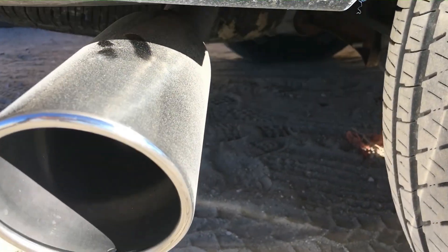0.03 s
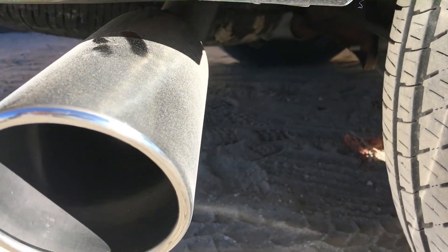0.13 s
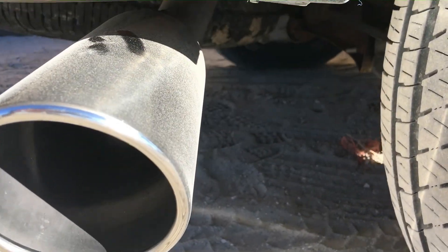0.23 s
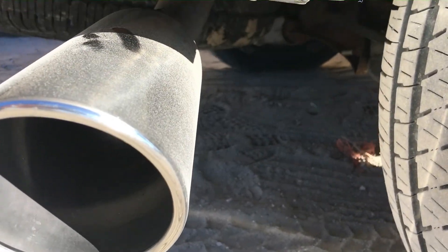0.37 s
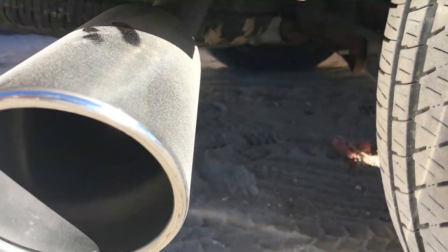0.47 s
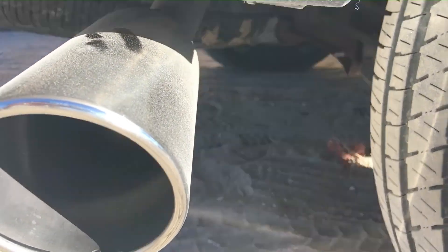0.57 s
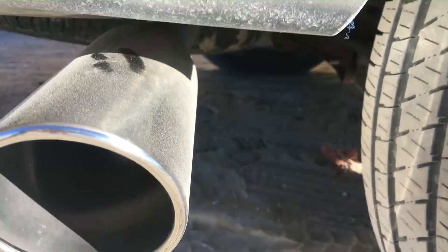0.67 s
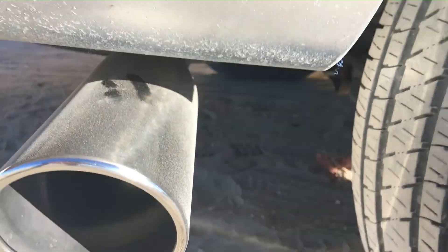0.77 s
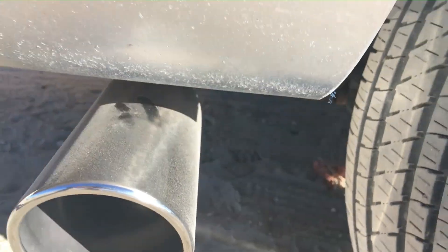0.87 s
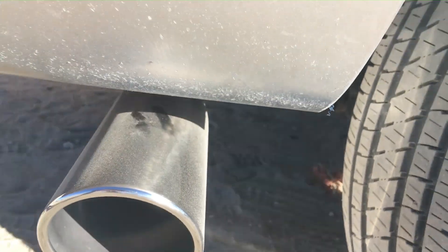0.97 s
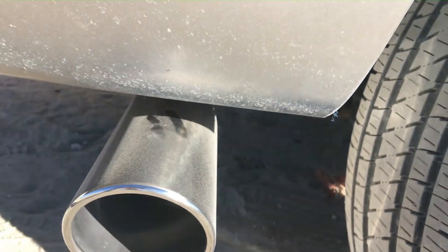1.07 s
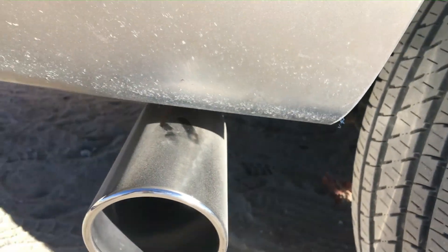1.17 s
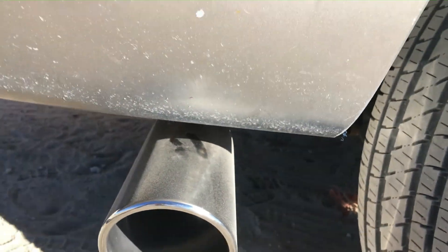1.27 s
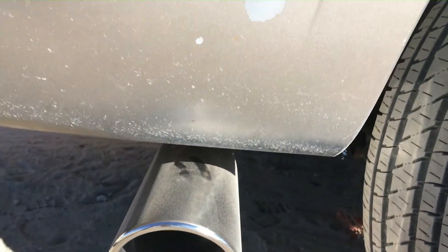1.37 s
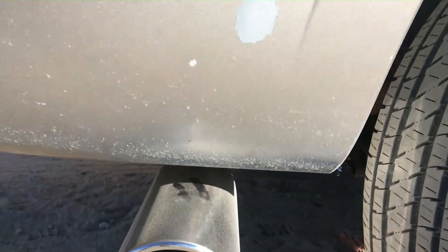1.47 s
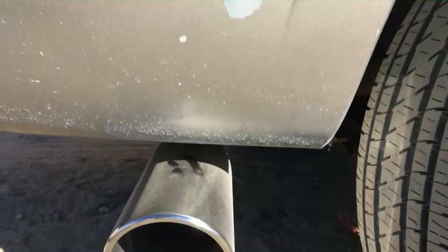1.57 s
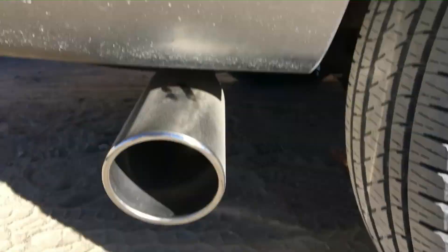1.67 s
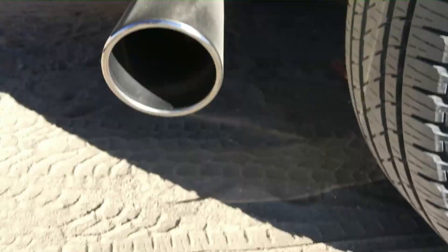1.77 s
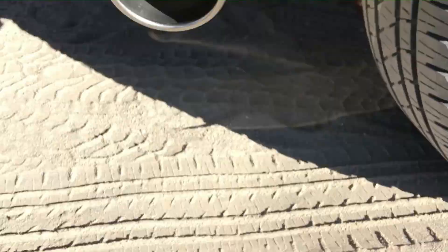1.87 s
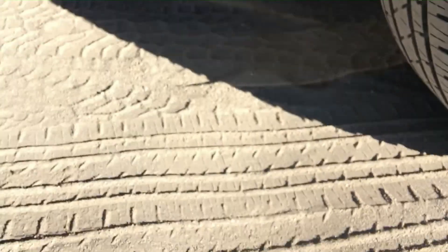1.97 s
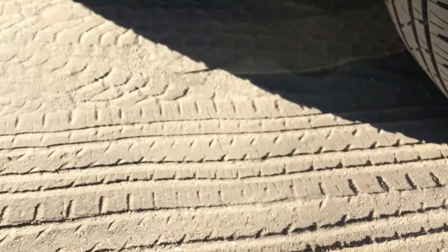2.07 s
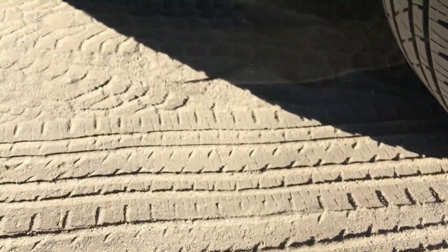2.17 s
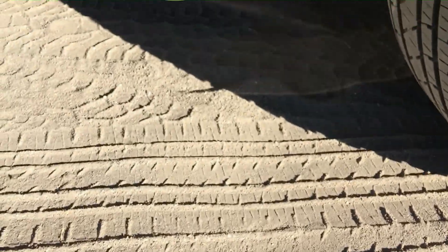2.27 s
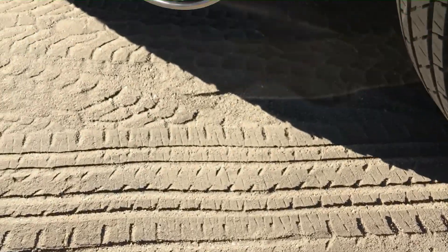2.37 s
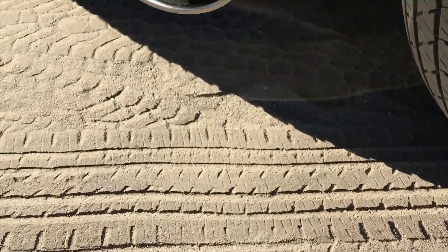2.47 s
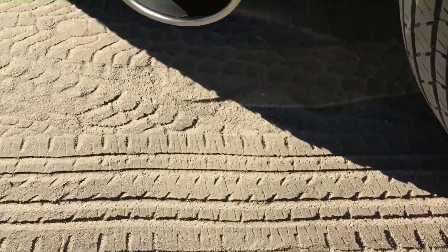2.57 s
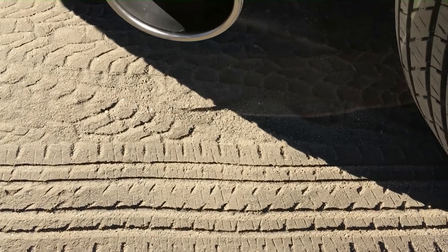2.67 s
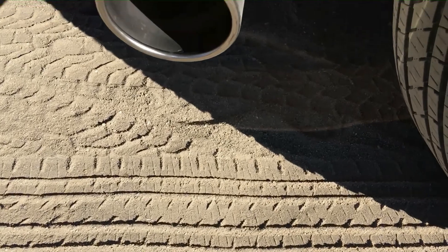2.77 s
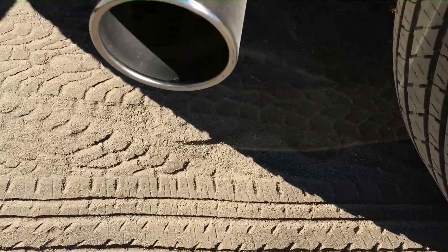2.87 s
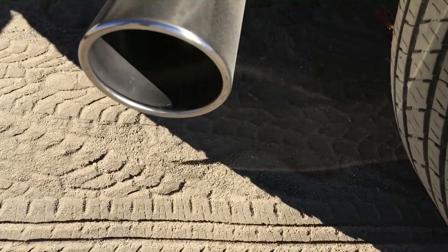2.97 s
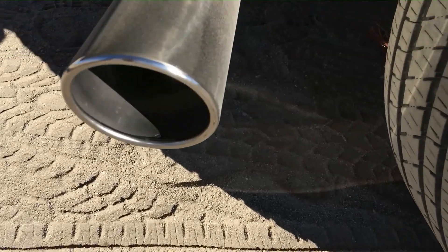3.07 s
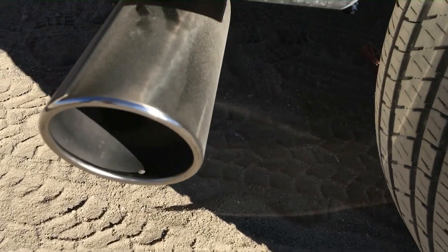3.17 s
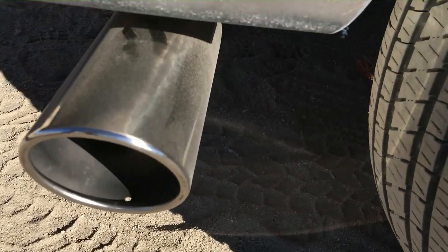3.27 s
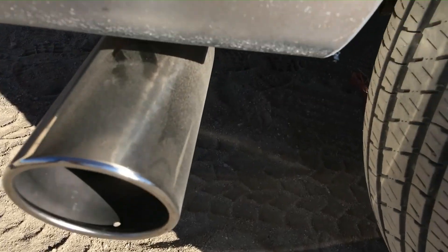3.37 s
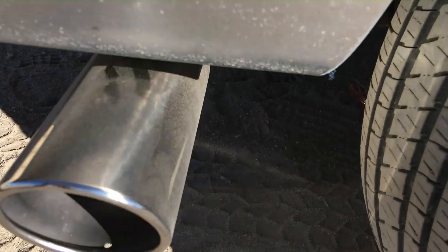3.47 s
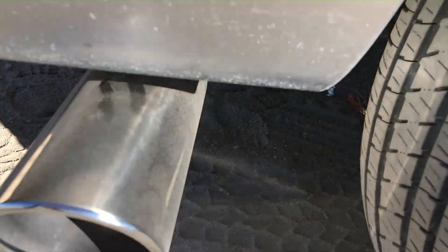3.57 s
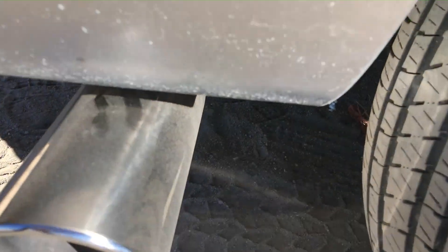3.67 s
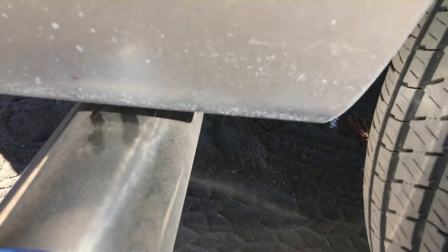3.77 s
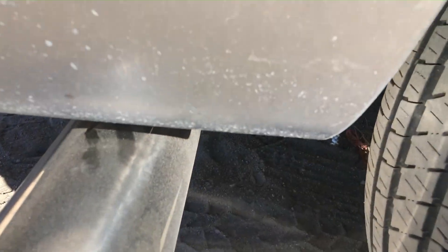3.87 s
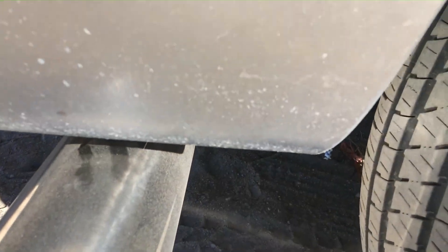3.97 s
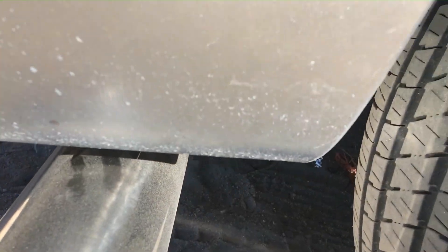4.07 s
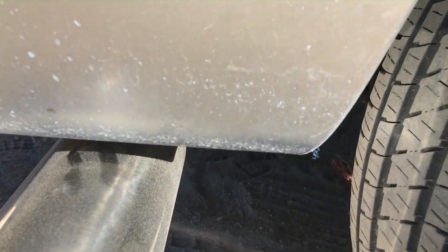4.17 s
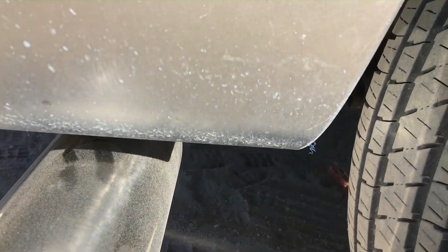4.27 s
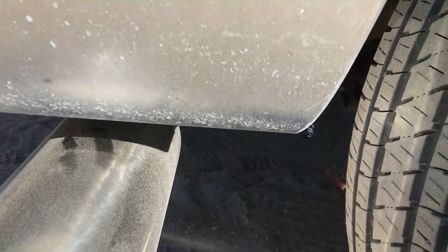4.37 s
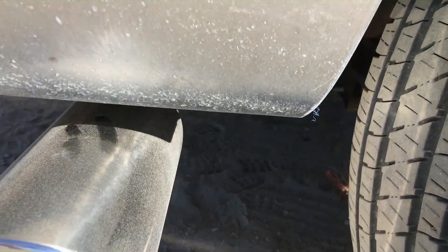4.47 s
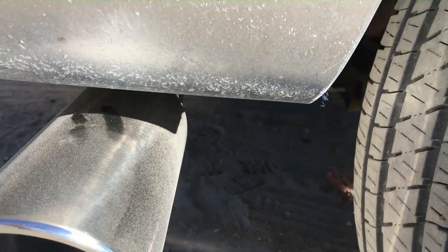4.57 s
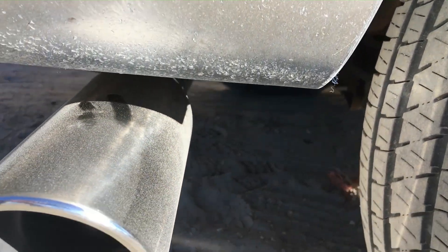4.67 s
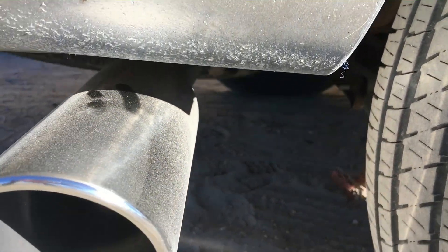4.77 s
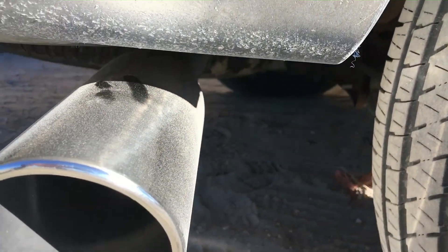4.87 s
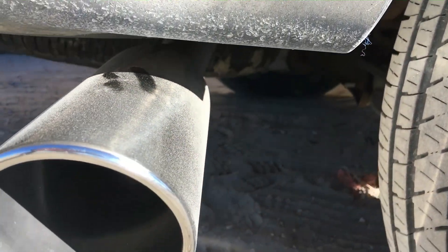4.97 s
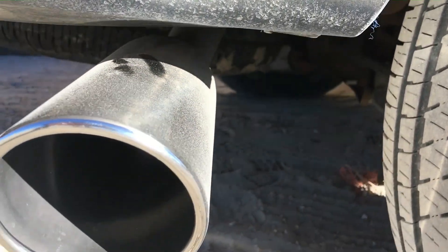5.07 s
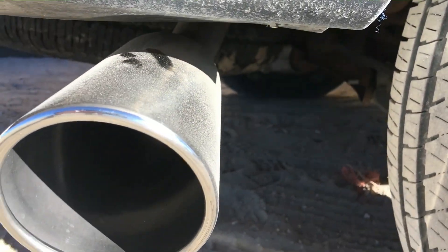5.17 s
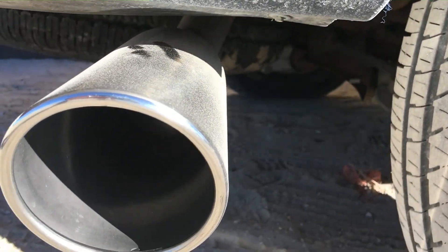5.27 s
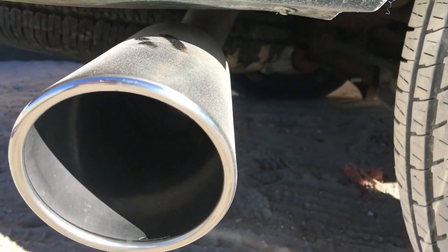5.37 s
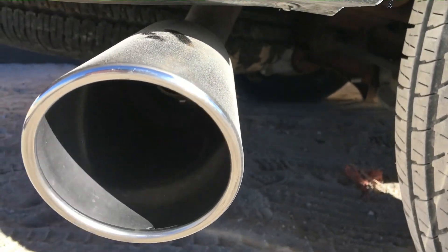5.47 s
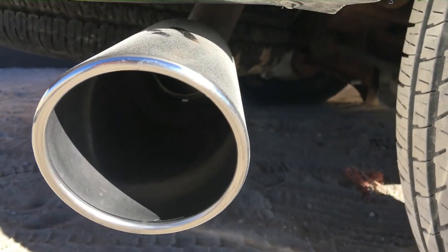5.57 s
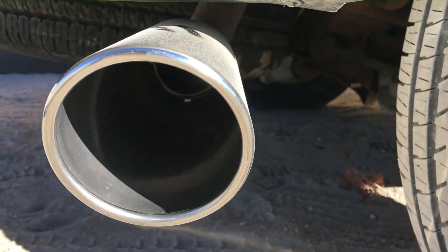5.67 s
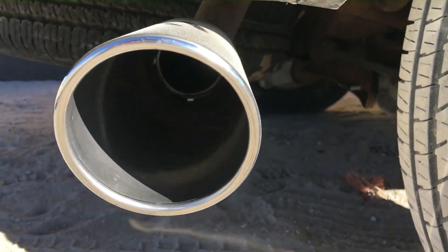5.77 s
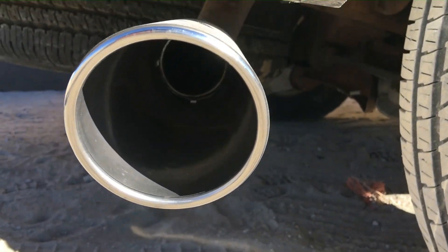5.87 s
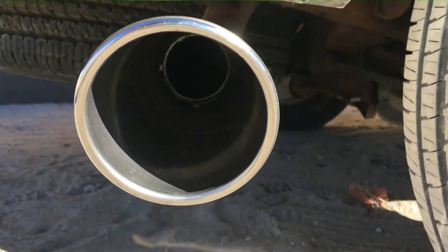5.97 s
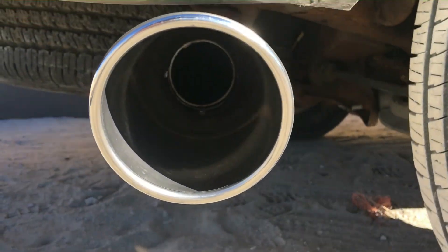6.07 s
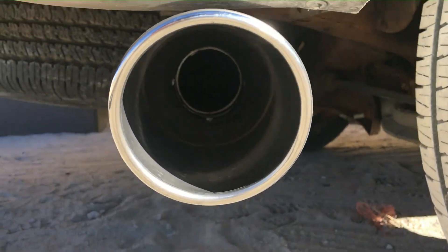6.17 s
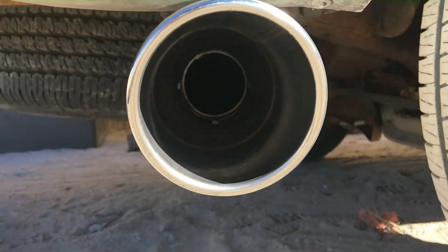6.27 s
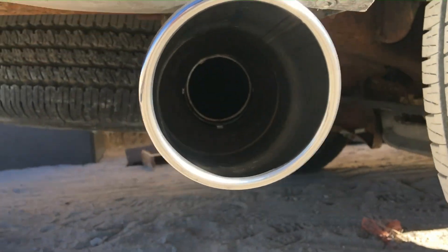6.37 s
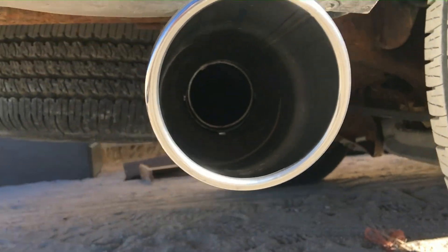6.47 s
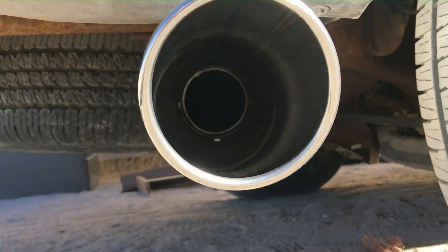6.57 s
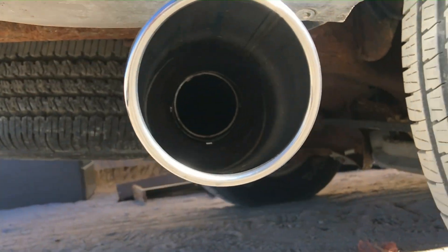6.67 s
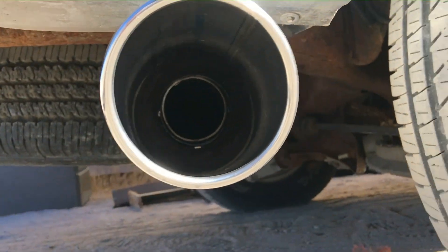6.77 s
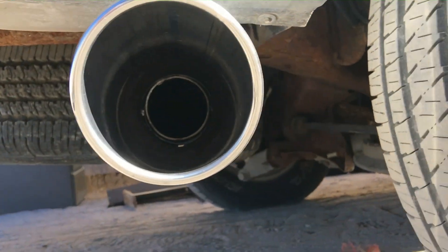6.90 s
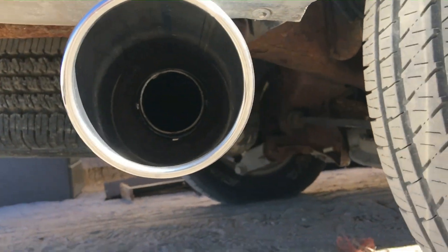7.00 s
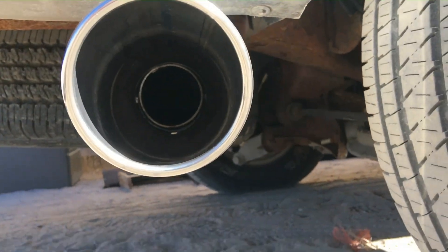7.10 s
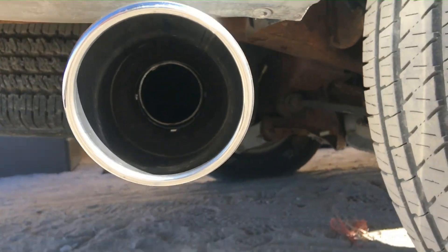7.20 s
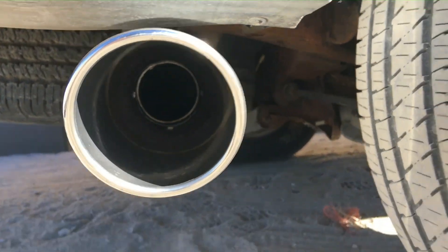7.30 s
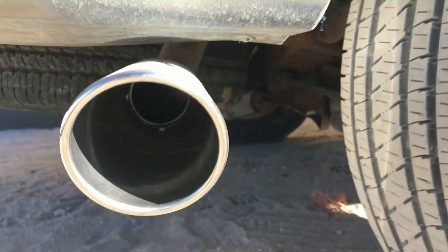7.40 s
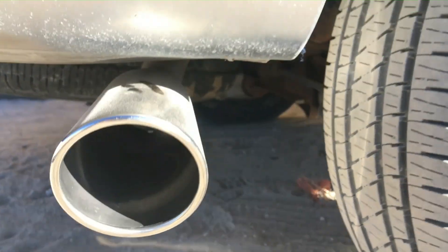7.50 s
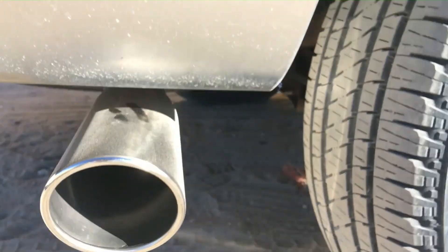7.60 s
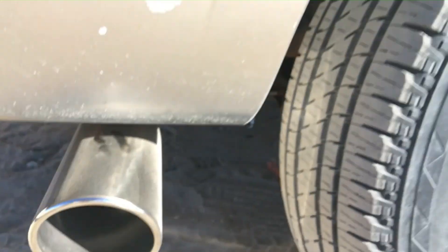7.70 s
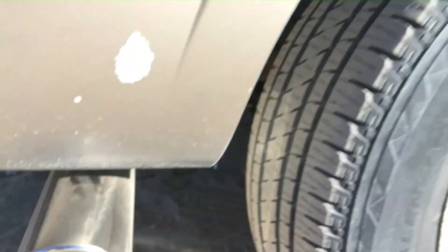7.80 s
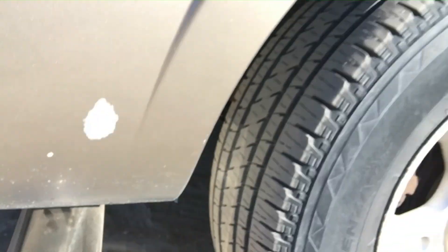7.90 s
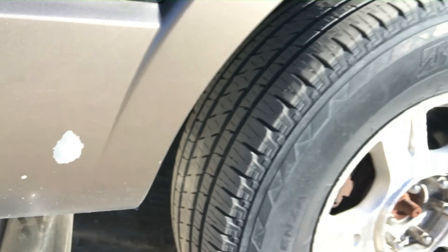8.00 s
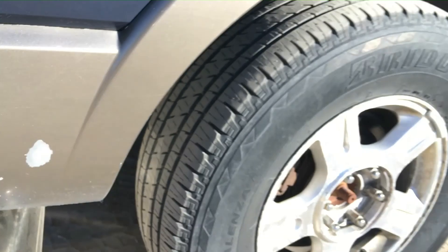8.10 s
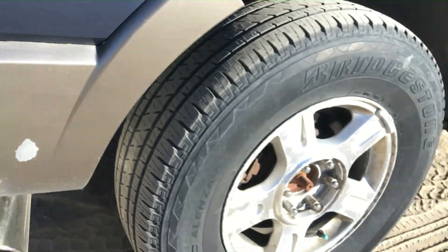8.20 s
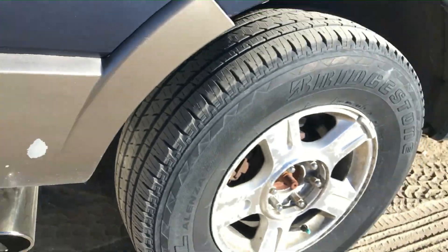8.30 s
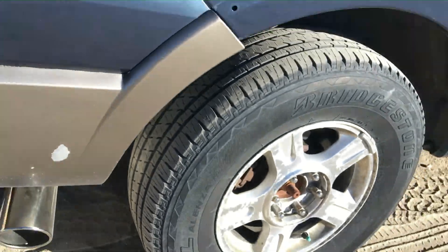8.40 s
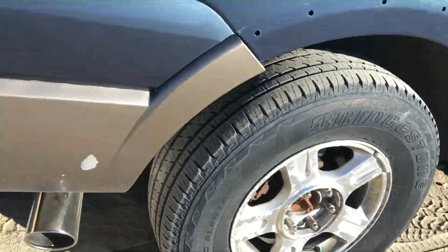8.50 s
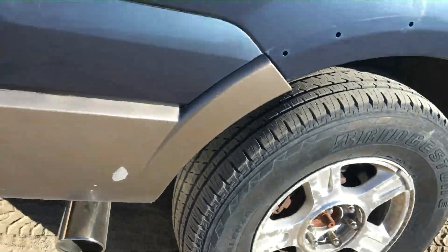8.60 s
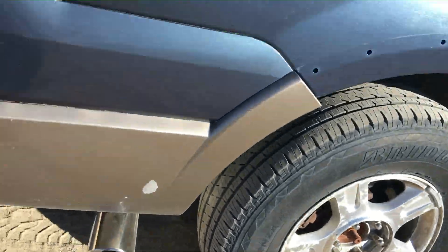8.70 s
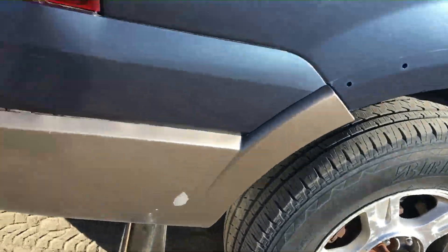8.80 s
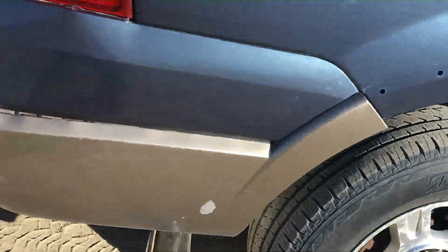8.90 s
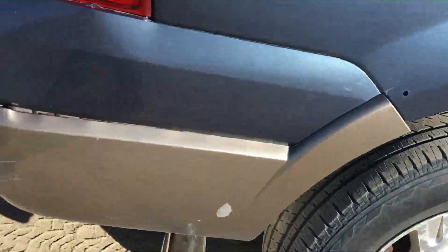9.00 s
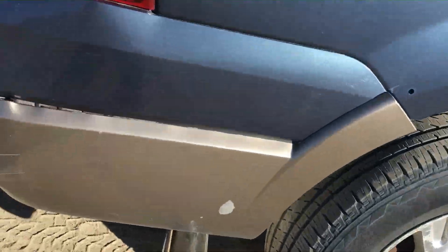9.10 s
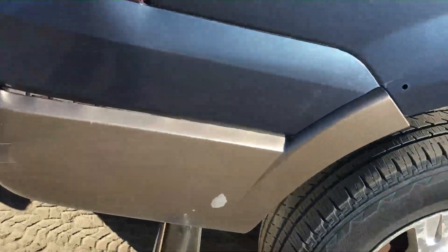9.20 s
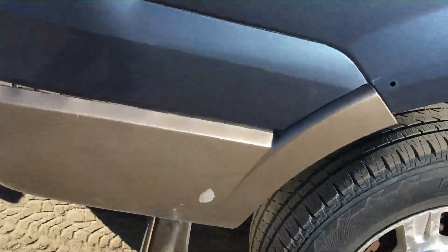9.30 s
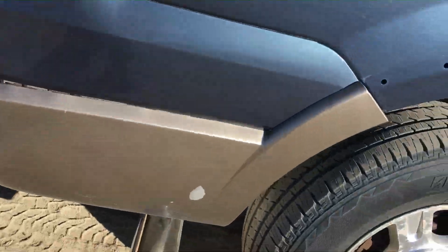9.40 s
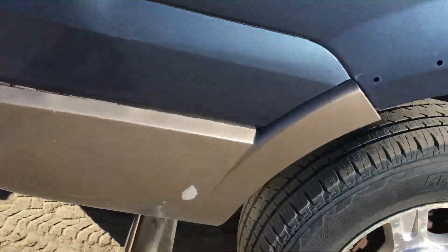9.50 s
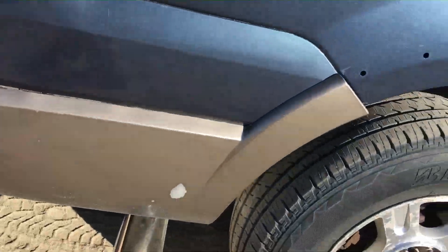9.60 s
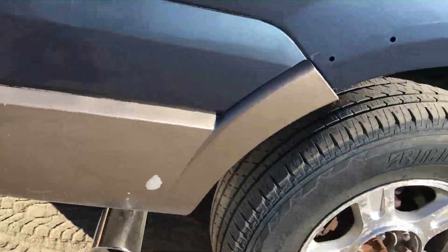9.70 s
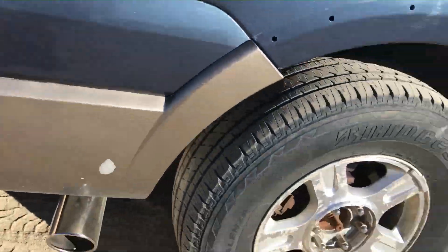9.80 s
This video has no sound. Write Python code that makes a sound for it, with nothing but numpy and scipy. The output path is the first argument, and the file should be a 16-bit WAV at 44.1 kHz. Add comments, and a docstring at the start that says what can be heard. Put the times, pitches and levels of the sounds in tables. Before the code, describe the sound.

A large V8 pickup idles outdoors, heard right beside the tailpipe as a deep, uneven throb with occasional harder chugs. Faint engine hiss, a thin wavering whine and quick metallic chuffs run underneath. The rumble eases as the microphone draws away, turns fuller and boomier as it faces the outlet, then drops near the end as the listener steps back with soft crunches of sand.

```python
"""The loping throb of a big V8 pickup at idle, close to its tailpipe; the listener leans in and out,
then steps back. Eight uneven firings a cycle ring the pipes of two cylinder banks and bark at the outlet.
The engine bay adds hiss, a run of chuffs each cycle, whines and valve ticks.
Sand crunches softly underfoot."""
import sys
import numpy as np
from scipy import signal
from scipy.fft import rfft, irfft, next_fast_len
from scipy.io import wavfile
from scipy.ndimage import uniform_filter1d

SR = 44100
rng = np.random.default_rng(int(sys.argv[2]) if len(sys.argv) > 2 else 0)


def dump(signal):
    """Clip the signal to [-1, 1] and save it as 16-bit WAV at the path in sys.argv[1]."""
    limited = np.clip(np.atleast_2d(signal).T, -1, 1)
    pcm = np.round(limited * 32767).astype(np.int16)
    wavfile.write(sys.argv[1], SR, pcm)


N = 434385
TIME = np.arange(N) / SR

# in firing order: cycle_fraction, thump_db, unevenness_factor, then bark_db at each BARK_HZ
CYLINDERS = [(0.014, 4.5, 1.4, 2.5, -2, -11.5, 8.5, -4), (0.157, 4, 1.8, 1.5, 0, -11, -13, -18),
             (0.2852, 0.5, 2.7, 1.5, -2, 3.5, -2.5, -18), (0.3879, -2.5, 1.5, -10.5, -16.5, -6.5, 9.5, -8),
             (0.5337, 4, 1.6, -5, -5.5, 2.5, -24.5, -16), (0.6408, 4, 0.9, 3.5, 2, -19, -6, 0.5),
             (0.765, 2, 1.2, -9.5, -6, 8, -6.5, 10.5), (0.9026, -1, 2.8, 4.5, -4, -10, -4, -4.5)]
# facing the outlet brings out its boom: time_s, gain_db
FACING = [(0, -1), (1.5, -5), (4.8, 0), (5.4, 3.5), (7.2, 3), (8, -5)]


def exhaust(cycles, jitter_s=.0002):
    """Uneven firings sound in four registers, each fading at its own rate with distance."""
    place, thump_db, unevenness = np.transpose(CYLINDERS)[:3]
    times, cylinder = each_cycle(cycles, place)
    burn = burns(times) * unevenness[cylinder]
    lateness, steepness = np.tanh(rng.standard_normal((len(times), 2))).T
    times = times + jitter_s * lateness
    thump = bank_pipes(times, cylinder, thump_db[cylinder], burn)
    boom, growl, bark = tailpipe(times, cylinder, burn, steepness)
    return (levelled(thump) * outlet_gain(near_db=-13, doubling_loss_db=4.67)
            + levelled(boom) * outlet_gain(near_db=-30, doubling_loss_db=7.9) * gain_of(curve(FACING))
            + levelled(growl) * outlet_gain(near_db=-31.5, doubling_loss_db=8.8)
            + levelled(bark) * outlet_gain(near_db=-32.5, doubling_loss_db=5.34))


# chugs: time_s, strength (ordinary firings stay within -1 to 1)
HARD_BURNS = [(.35, 1), (.525, 0.95), (2.17, 1.7), (2.41, 1.5), (2.76, 2.1), (3.11, 1.2), (3.8, 1.1),
              (6.0, .8), (6.34, 1.5), (7.2, 1.9)]


def burns(times, rebound=0.65, shared=0.15):
    """Strength per firing: a cylinder that burns weakly tends to burn hard next cycle, so the idle lopes."""
    count = len(CYLINDERS)
    chance = rng.standard_normal((len(times) // count + 1, count + 1))
    chance = (chance[:, 1:] + shared * chance[:, :1]) / np.hypot(1, shared)
    alternating = signal.lfilter([np.sqrt(1 - rebound ** 2)], [1, rebound], chance, axis=0)
    burn = np.tanh(alternating).ravel()[:len(times)]
    hard_s, strength = np.transpose(HARD_BURNS)
    hard = abs(times - hard_s[:, None]).argmin(axis=1)
    burn[hard - count] = -rebound * strength
    burn[hard] = strength
    return burn


# in firing order: bank_index
CYLINDER_BANK = [0, 1, 0, 0, 1, 0, 1, 1]
# low pipe modes, one list per bank: pitch_hz, width_hz, level_db, polarity
BANK_MODES = [
    [(54.17, 20.8, -20.5, -1), (58.87, 20.67, -17, 1), (129.8, 19.7, -27, -1), (145.8, 4.9, -28.5, 1),
     (169.4, 67, -41, -1)],
    [(55, 44, -29.5, 1), (84.86, 6.6, -26.5, -1), (106, 7, -45.5, -1), (151.3, 44, -43, -1),
     (217.9, 19, -43, -1)],
]


def bank_pipes(times, cylinder, thump_db, burn, burn_db_per_hz=.018, lopsided=0.03):
    """Each firing thumps through its bank's pipe; a hard burn lifts the higher modes most."""
    thump = np.zeros(N)
    for bank, modes in enumerate(BANK_MODES):
        fires = np.array(CYLINDER_BANK)[cylinder] == bank
        for hz, width_hz, db, polarity in modes:
            train = clicks(times, fires * gain_of(db + thump_db + burn_db_per_hz * hz * burn))
            thump += polarity * resonate(train, hz, width_hz)
    thump = evened(cut(thump, 21, "high"))
    # gas is pushed out harder than it is drawn back
    thump = cut(thump + lopsided * thump ** 2, 260, "low", order=2)
    # an open pipe radiates no deep bass
    return coloured(thump, [(22, -40.5), (31, -24), (42, 0), (250, -0.5), (400, -15.5)])


# points of each cylinder's bark spectrum: frequency_hz
BARK_HZ = [220, 300, 410, 500, 575]
# upper pipe modes: pitch_hz, width_hz, level_db, muffler_delay_s
TAILPIPE_MODES = [(210.7, 44, 7.5, .003), (303.6, 58, -5, 0.0012), (328.3, 73, -7, 0.006084),
                  (385.7, 55, -1.5, 0.001), (436.4, 55.6, -2.5, .002), (486, 58.7, -7, .004),
                  (564.8, 31.4, -6.5, 0.0011), (654.6, 45, -20, .002)]


def tailpipe(times, cylinder, burn, steepness, lead_s=0.00622, gas_decay_s=0.032, gas_share=.016):
    """Steep firing fronts and gas puffs ring the shared tailpipe; returns boom, growl and bark."""
    burn_db, steepness_db = 1.45, .9
    gas = rng.standard_normal(N)
    rings = []
    for hz, width_hz, db, delay_s in TAILPIPE_MODES:
        bark_db = np.array([np.interp(hz, BARK_HZ, row[3:]) for row in CYLINDERS])
        sizes = gain_of(db + bark_db[cylinder] + burn_db * burn + steepness_db * steepness)
        fronts = clicks(times - lead_s + delay_s, sizes)
        gas_puffs = gas_share * dying(fronts, gas_decay_s) * gas
        rings.append(resonate_twice(fronts + gas_puffs, hz, width_hz))
    return rings[0], sum(rings[1:3]), sum(rings[3:])


BAY_DB = -51.5  # far off, so independent of the distance to the outlet
# fan hiss spectrum: frequency_hz, level_db
HISS_SPECTRUM = [(500, -0.5), (800, -0.5), (1100, -3.5), (1350, -6.5), (1800, -9), (2150, -11),
                 (2650, -13.5), (3000, -16), (3400, -23.5), (4400, -27), (4850, -33.5), (6200, -29.5),
                 (8000, -37), (15500, -41)]
# narrow rings in the hiss: pitch_hz, width_hz, level_db
BAY_RINGS = [(998, 7, -10), (1510, 16, -17), (1690, 22, -18), (1927, 14, -16), (2228, 7, -18.5),
             (2628, 8, -21.5), (2800, 50, -23), (3680, 70, -28), (3810, 40, -30), (4230, 40, -29.5),
             (4410, 30, -29.5)]
# listener stepping back beside the wheel arch: time_s, share
BESIDE_ARCH = [(7.6, 0), (8.3, 1)]


def engine_bay(hiss_db=4, wash_db=-3, flutter_db=1.5, ring_swell_db=1, shadow_db=-4):
    """Fluttering fan hiss, a low wash and metallic rings; the last two carry best under the truck."""
    hiss = evened(coloured(rng.standard_normal(N), HISS_SPECTRUM)) * gain_of(flutter_db * drift(53))
    wash_spectrum = [(20, 0), (300, 2.5), (750, -5), (1100, -3), (1400, -8.5), (3000, -41)]
    wash = evened(coloured(rng.standard_normal(N), wash_spectrum))
    rings = np.zeros(N)
    for hz, width_hz, db in BAY_RINGS:
        swell = gain_of(db + ring_swell_db * drift(0.78))
        ring = resonate(rng.standard_normal(N), hz, width_hz)
        rings += swell * evened(resonate(ring, hz, 4 * width_hz))
    underside = (gain_of(wash_db) * wash + rings) * gain_of(shadow_db * curve(BESIDE_ARCH))
    return (gain_of(hiss_db) * hiss + underside) * gain_of(BAY_DB)


# run of chuffs: cycle_fraction, level_db
CHUFFS = [(0.516, 2.5), (.585, 2.5), (0.661, -3), (0.719, -7.5), (0.779, -7.5), (.825, -9)]
# metallic resonances: pitch_hz, width_hz, level_db, arch_extra_db, bumper_extra_db
CHUFF_MODES = [(1567, 190, 1.5, 1, -2.5), (1684, 170, -0.5, 1, 2.5), (1856, 140, 0, -3.5, 0.5),
               (1947, 21, 4, -4, 6), (2610, 730, -16, 6, -2), (2583, 47, -6.5, -3, 1),
               (2894, 230, -16.5, 9.5, -1), (3050, 80, -16, 3, 0.5), (4170, 160, -24.5, 0, 2.5)]
# listener leaning in under the bumper: start_s, length_s
UNDER_BUMPER = [(0, 1.1), (4.389, 1.7)]


def chuffs(cycles, trim_db=-2, rise_s=0.0035, decay_s=0.0065, uneven_db=1, accent_db=7, bumper_db=1):
    """Once a cycle a quick run of dry metallic chuffs; the first stands out beside the wheel arch."""
    place, chuff_db = np.transpose(CHUFFS)
    times, chuff = each_cycle(cycles, place)
    beside = curve(BESIDE_ARCH)
    under = sum(stroke(*lean) for lean in UNDER_BUMPER)
    accent = np.interp(times, TIME, beside) * (chuff == 0)
    sizes = gain_of(chuff_db[chuff] + accent_db * accent + uneven_db * rng.standard_normal(len(times)))
    air = puffs(dying(clicks(times, sizes), rise_s), decay_s)
    ring = sum(gain_of(db + arch_extra_db * beside + bumper_extra_db * under)
               * resonate_twice(air, hz, width_hz)
               for hz, width_hz, db, arch_extra_db, bumper_extra_db in CHUFF_MODES)
    return levelled(ring) * gain_of(BAY_DB + trim_db + bumper_db * under)


# resonances under the whine: pitch_hz, width_hz, level_db
WHINE_MODES = [(1231, 22, -1), (1196, 20, -9)]
# where the whine carries best: start_s, length_s, boost_db
WHINE_SWELLS = [(0, 1.1, 7), (2.911, 1.6, 6.5), (4.49, 1.47, 5), (7.02, 0.25, 11), (7.3, 0.19, 5),
                (7.702, 0.56, 10.5), (8.148, 0.69, 7.5)]


def belt_whine(cycles, base_db=-57, periods_per_turn=104, waver_hz=10, flutter=.6, wander_db=1.3):
    """A rough whine at a high multiple of the crankshaft speed rings two fixed resonances."""
    periods = 2 * periods_per_turn * cycles + np.cumsum(waver_hz * drift(25)) / SR
    rub = np.sin(2 * np.pi * periods) * (1 + flutter * drift(45))
    whine = sum(gain_of(db) * resonate(rub, hz, width_hz) for hz, width_hz, db in WHINE_MODES)
    return levelled(whine) * gain_of(base_db + wander_db * drift(3) + swells_db(WHINE_SWELLS))


# sharp grit clicks: start_s, level_db
GRIT = [(1.467, -48), (1.494, -34), (1.528, -44), (1.562, -40), (1.6467, -37), (5.5623, -45), (6.3415, -48),
        (6.686, -42), (8.3913, -38), (8.4542, -35)]
# short scuffs and a squeak: start_s, length_s, centre_hz, width_hz, level_db
SCUFFS = [(6.603, 0.013, 13600, 1840, -53), (8.057, 0.012, 6800, 5000, -53),
          (8.07, 0.033, 6500, 5000, -53.5), (8.313, 0.04, 9000, 9000, -59), (8.44, 0.088, 10500, 9050, -61),
          (8.975, 0.041, 10200, 9000, -61)]
# feet shuffling in the sand: start_s, length_s, level_db
SHUFFLES = [(7.987, 0.4, -66), (8.19, 1, -70.5), (8.923, 0.17, -73), (9.398, 1, -60.5)]


def fizz_and_sand(floor_db=-78, grains_per_s=4000, spread_db=-5.5, clump_db=2.3, grit_trim_db=-6):
    """Gas fizzes at the outlet; sand rustles, cracks and scuffs under shuffling feet."""
    spectrum = [(2000, -25), (4800, 0), (6300, 1), (8000, -2.5), (9500, 1), (10500, -5.5),
                (12000, -0.5), (15500, -8.5)]
    sizes = gain_of(spread_db * np.minimum(rng.exponential(1, N), 5))
    grains = sizes * (rng.random(N) < grains_per_s / SR)
    rustle = evened(coloured(puffs(grains, decay_s=0.0015), spectrum))
    fizz_gain = outlet_gain(near_db=-69, doubling_loss_db=4.9)
    feet_gain = gain_of(floor_db) * curve(BESIDE_ARCH)
    feet_gain += sum(gain_of(db) * stroke(start_s, length_s) ** 2 for start_s, length_s, db in SHUFFLES)
    sound = rustle * (fizz_gain + feet_gain) * gain_of(clump_db * drift(24))
    grit_s, grit_db = np.transpose(GRIT)
    cracks = clicks(grit_s, gain_of(grit_db + grit_trim_db))
    sound += coloured(puffs(cracks, decay_s=.0022), spectrum)
    for start_s, length_s, hz, width_hz, db in SCUFFS:
        scuff = evened(resonate_twice(rng.standard_normal(N), hz, width_hz))
        sound += gain_of(db) * stroke(start_s, length_s) * scuff
    return sound


# valve ticks: cycle_fraction, level_db
VALVE_TICKS = [(0.029, 1), (0.654, -4.5)]


def valves(cycles, level_db=-73.5, uneven_db=1, decay_s=.004):
    """Light dry ticks locked to the camshaft."""
    place, tick_db = np.transpose(VALVE_TICKS)
    times, valve = each_cycle(cycles, place)
    sizes = gain_of(tick_db[valve] + uneven_db * rng.standard_normal(len(times)))
    ticks = puffs(clicks(times, sizes), decay_s)
    spectrum = [(1200, -12), (2500, -3.5), (4300, -1.5), (5000, -9.5), (6500, -9), (9500, -15),
                (15000, -21)]
    return gain_of(level_db) * evened(coloured(ticks, spectrum))


# where the whistle carries best: start_s, length_s, boost_db
PUMP_SWELLS = [(2.6, 0.85, 6), (4, 0.76, 6.5), (5.302, 1.3, 6.5), (7.75, .2, 11)]


def fuel_pump(pitch_hz=5731, waver_hz=6, base_db=-81, flutter_db=2.5, wander_db=1.5, shadow_db=-4):
    """The pump whistles thinly, fading in and out, weaker beside the wheel arch."""
    whistle = np.sin(2 * np.pi * np.cumsum(pitch_hz + waver_hz * drift(30)) / SR)
    whistle *= gain_of(flutter_db * drift(8.3) + wander_db * drift(1.5) + shadow_db * curve(BESIDE_ARCH))
    return evened(whistle) * gain_of(base_db + swells_db(PUMP_SWELLS))


# listener to outlet: time_s, distance_m
OUTLET_DISTANCE = [(0, 0.26), (.5, 0.28), (1.15, 0.39), (1.9, 0.55), (2.7, 0.44), (3.8, 0.32), (5.1, 0.3),
                   (6.0, 0.33), (7.25, 0.32), (7.8, 0.48), (8.45, 1), (9.85, 1)]


def outlet_gain(near_db, doubling_loss_db, near_m=.3):
    """Sound from the outlet loses a set number of decibels per doubling of the distance."""
    return gain_of(near_db - doubling_loss_db * np.log2(curve(OUTLET_DISTANCE) / near_m))


def each_cycle(cycles, places):
    """Times at which the camshaft passes the given cycle fractions, and the index of each."""
    marks = (np.arange(int(cycles[-1]) + 1)[:, None] + places).ravel()
    which = np.arange(len(marks)) % len(places)
    inside = marks < cycles[-1]
    return np.interp(marks[inside], cycles, TIME), which[inside]


def gain_of(db):
    """Decibels to amplitude."""
    return 10 ** (np.asarray(db) / 20)


def evened(x):
    """Scales to rms 1."""
    return x / np.sqrt(np.mean(x ** 2) + 1e-20)


def levelled(x):
    """Scales to rms 1 over about half a second, keeping the throb."""
    power = uniform_filter1d(uniform_filter1d(x ** 2, size=22600), size=15000)
    return x / np.sqrt(power + 1e-20)


def curve(points):
    """Joins (time_s, value) points by straight lines."""
    return np.interp(TIME, *np.transpose(points))


def stroke(start_s, length_s):
    """A half-sine rise and fall."""
    inside = (TIME > start_s) & (TIME < start_s + length_s)
    return inside * np.sin(np.pi * (TIME - start_s) / length_s)


def swells_db(rows):
    """Sum of half-sine boosts."""
    return sum(db * stroke(start_s, length_s) for start_s, length_s, db in rows)


def drift(top_hz):
    """Random wander of rms 1, up to the given rate."""
    coarse_s = TIME[::100]
    bins_hz = np.fft.rfftfreq(len(coarse_s), coarse_s[1])
    spectrum = rfft(rng.standard_normal(len(coarse_s))) * (bins_hz < top_hz)
    return evened(np.interp(TIME, coarse_s, irfft(spectrum, len(coarse_s))))


def coloured(x, spectrum):
    """Filters by (frequency_hz, level_db) points."""
    hz, db = np.transpose(spectrum)
    size = next_fast_len(N)
    bins_hz = np.fft.rfftfreq(size, 1 / SR)
    gain = gain_of(np.interp(np.log(bins_hz + 1), np.log(hz + 1), db))
    return irfft(rfft(x, size) * gain, size)[:N]


def resonate(x, hz, width_hz):
    """A resonance of peak gain 1."""
    return signal.lfilter(*signal.iirpeak(hz, hz / width_hz, SR), x)


def resonate_twice(x, hz, width_hz):
    """Two equal resonances in series, for steeper skirts."""
    return resonate(resonate(x, hz, width_hz), hz, width_hz)


def cut(x, hz, kind, order=4):
    """High-pass or low-pass."""
    return signal.sosfilt(signal.butter(order, hz, kind, fs=SR, output="sos"), x)


def clicks(times, sizes):
    """A train of single impulses."""
    at = np.round(times * SR).astype(int)
    inside = (at >= 0) & (at < N)
    return np.bincount(at[inside], sizes[inside], N)


def dying(train, decay_s):
    """Each impulse becomes an exponential decay."""
    return signal.lfilter([1], [1, -np.exp(-1 / (decay_s * SR))], train + 1e-18)


def puffs(train, decay_s):
    """Each impulse becomes a dying burst of noise."""
    return dying(train, decay_s) * rng.standard_normal(N)


# slowly hunting idle: time_s, crankshaft_rpm
IDLE_SPEED = [(0, 697.2), (.64, 700.5), (1.38, 716.8), (1.74, 685.9), (3.45, 689.3), (3.75, 709.9),
              (4.41, 725), (5.79, 691), (7.83, 710.5), (8.75, 711.4), (9.85, 690.5)]


def scene():
    """Mono mix; one four-stroke cycle takes two turns of the crankshaft."""
    cycles = np.cumsum(curve(IDLE_SPEED)) / (2 * 60 * SR)
    engine = exhaust(cycles) + engine_bay() + chuffs(cycles) + valves(cycles) + belt_whine(cycles)
    return (engine + fuel_pump() + fizz_and_sand())[None]


def record(dry):
    """A steep low-pass removes the highest treble."""
    edge_hz = 15850
    lowpass = signal.firwin(511, edge_hz, window=("kaiser", 9), fs=SR)
    return signal.oaconvolve(dry, lowpass[None], "same")


dry = scene()
out = record(dry)
dump(out)
```